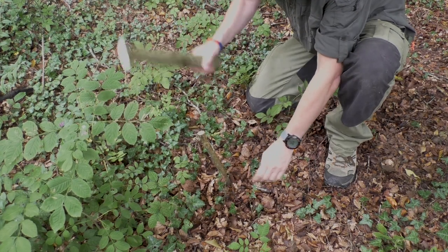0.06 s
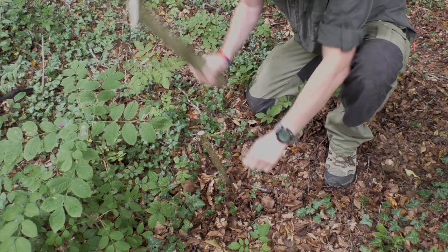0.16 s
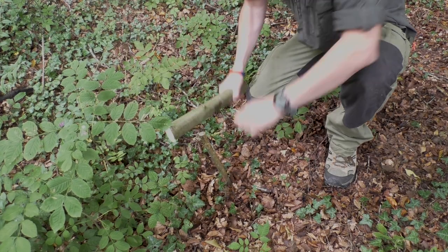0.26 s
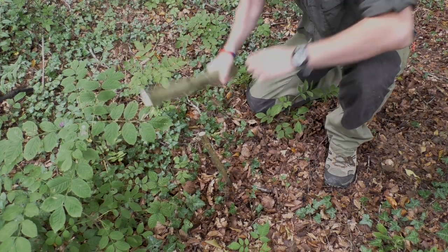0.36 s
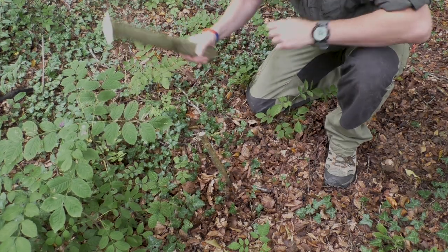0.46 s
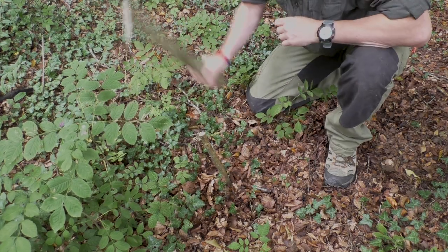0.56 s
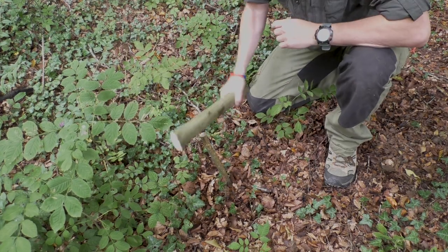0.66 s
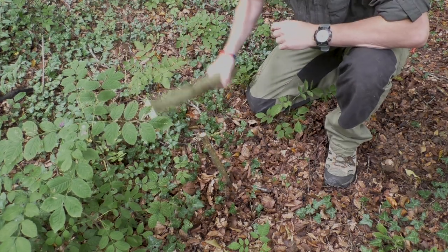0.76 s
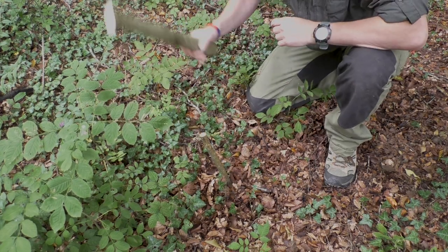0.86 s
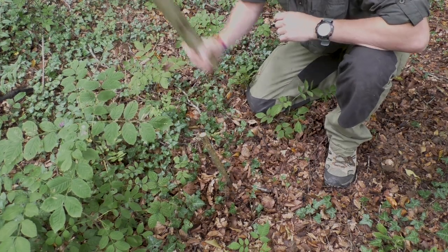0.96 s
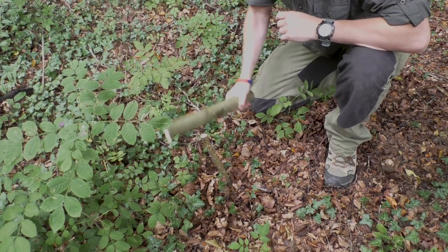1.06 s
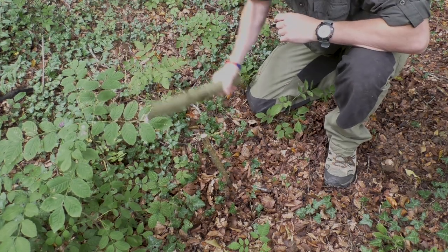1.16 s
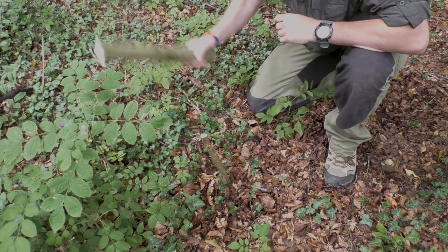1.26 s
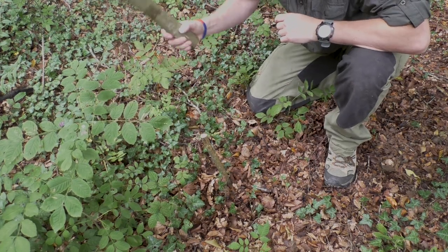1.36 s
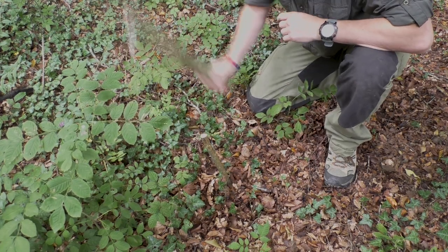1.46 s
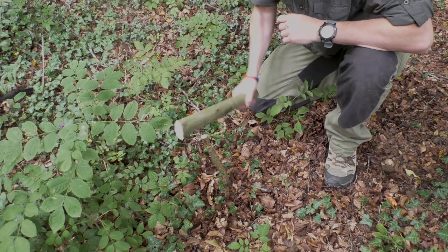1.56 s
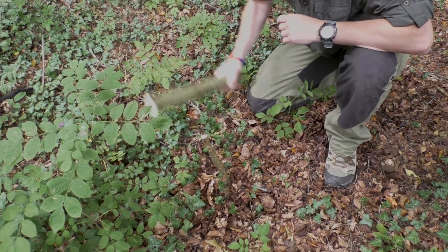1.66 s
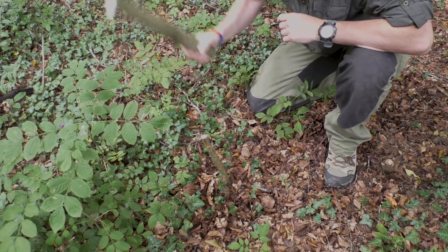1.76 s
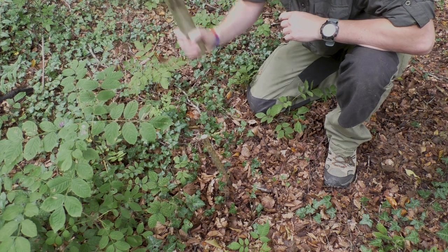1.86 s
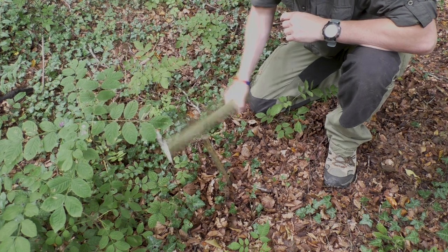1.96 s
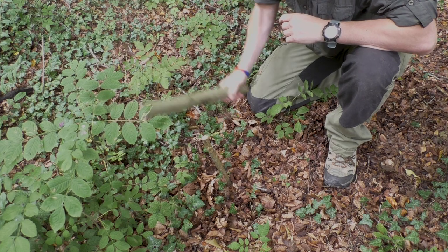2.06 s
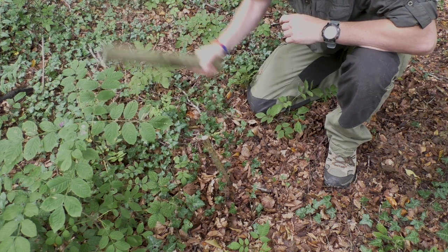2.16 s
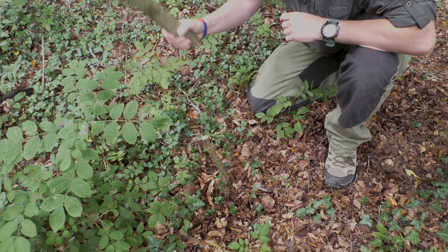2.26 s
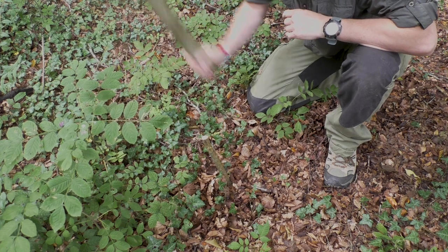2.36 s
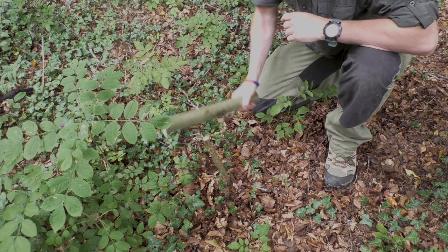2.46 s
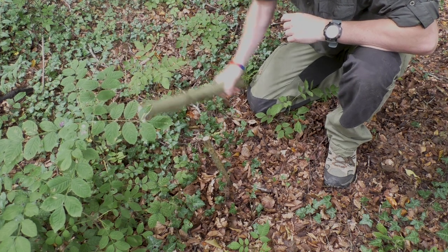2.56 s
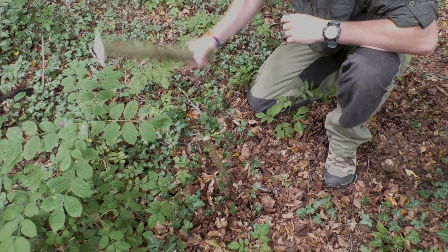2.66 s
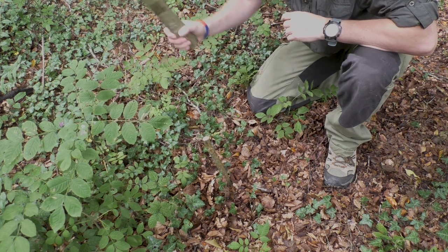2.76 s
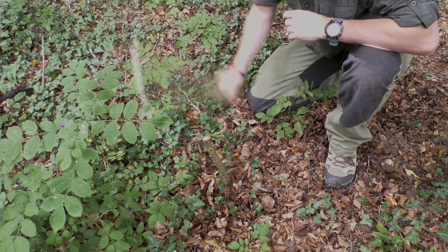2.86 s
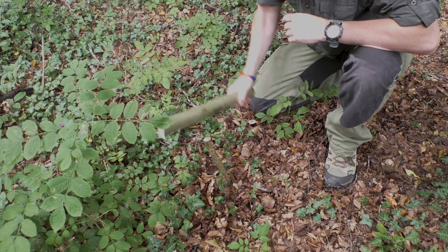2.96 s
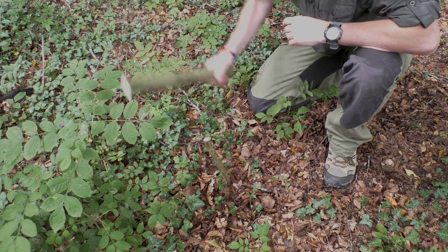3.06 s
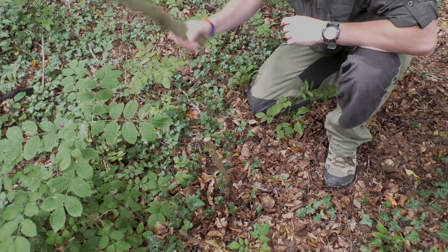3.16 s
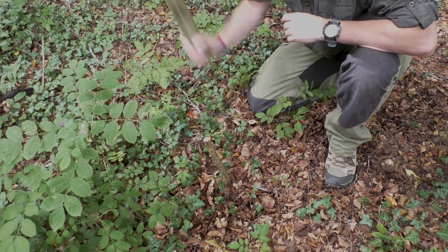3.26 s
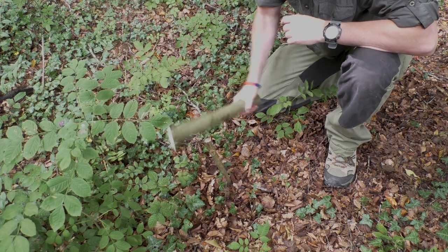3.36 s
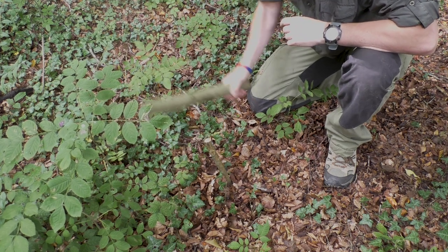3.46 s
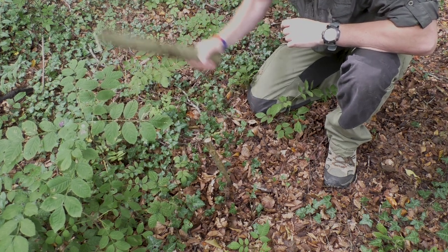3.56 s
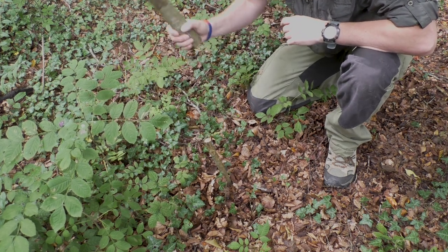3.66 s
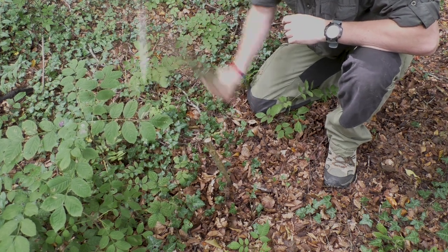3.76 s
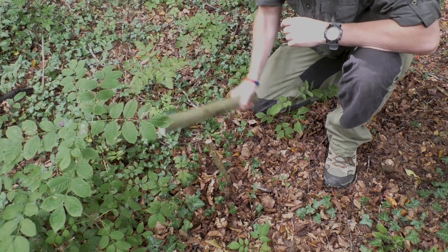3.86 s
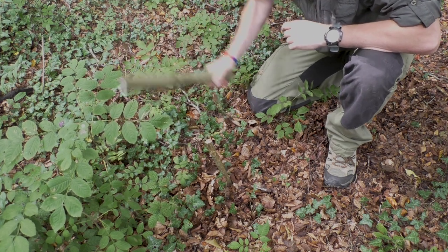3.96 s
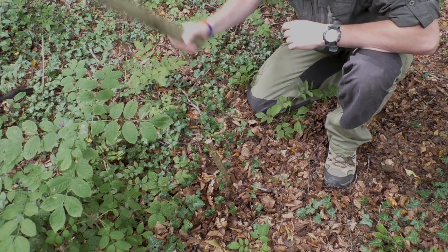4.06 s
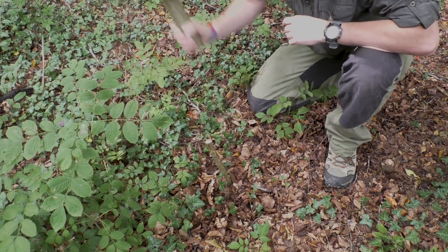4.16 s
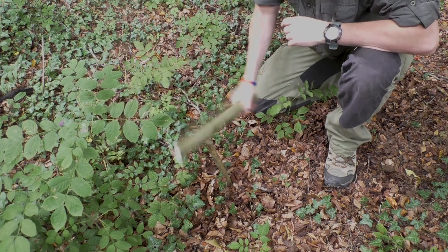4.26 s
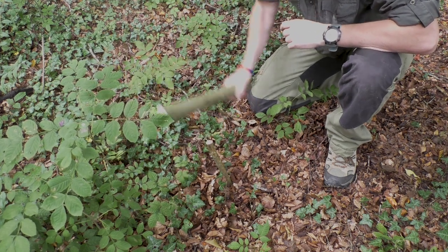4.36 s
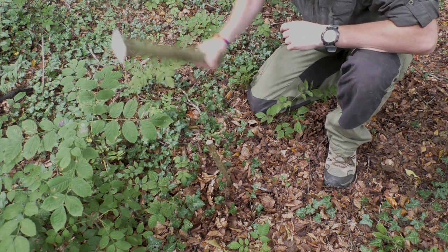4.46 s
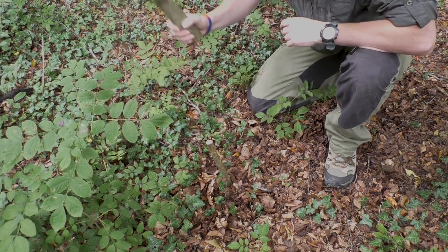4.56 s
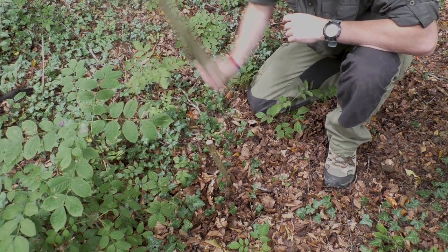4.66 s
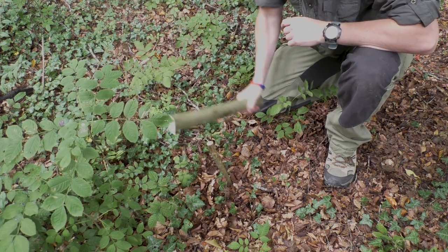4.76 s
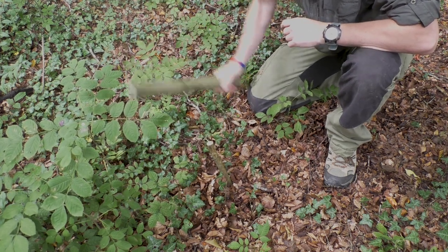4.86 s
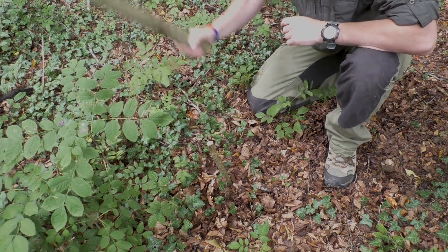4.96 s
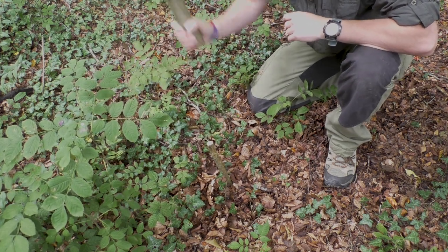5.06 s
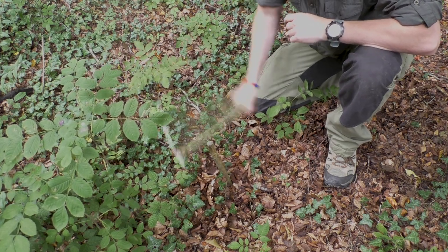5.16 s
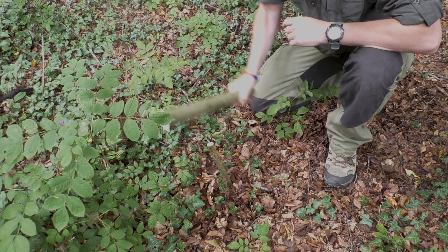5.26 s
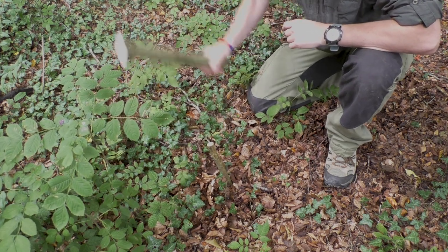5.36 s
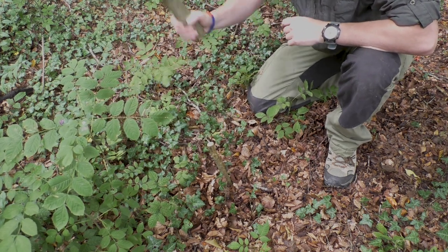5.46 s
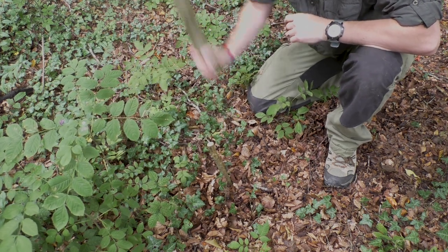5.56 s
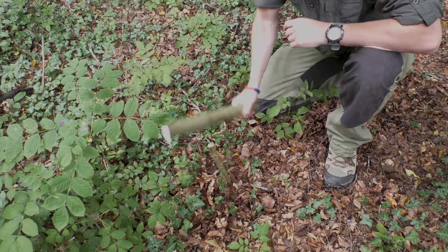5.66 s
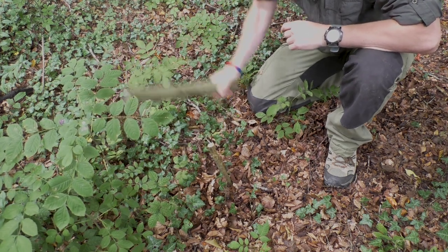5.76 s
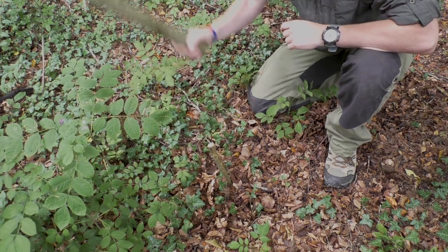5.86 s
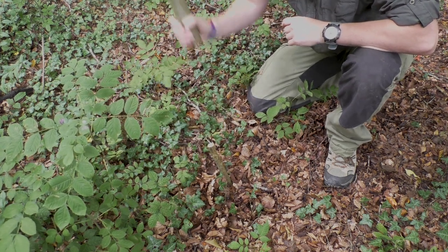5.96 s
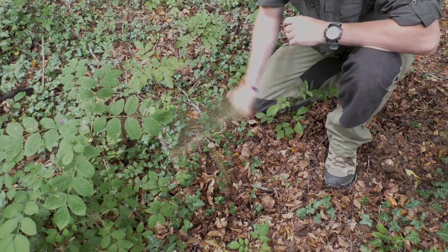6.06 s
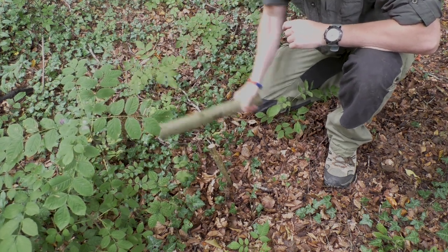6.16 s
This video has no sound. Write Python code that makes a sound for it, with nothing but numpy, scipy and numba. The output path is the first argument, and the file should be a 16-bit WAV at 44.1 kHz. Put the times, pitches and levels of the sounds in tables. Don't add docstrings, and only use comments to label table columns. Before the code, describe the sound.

Regular hammering with wood on wood, outdoors in woodland. Each blow is a hard, distorted clack with snapping bark, a short peg note and a dull soil thump, then a faint scattered echo from trees. Thuds deepen as the peg sinks; the last blow is softer and duller. Sleeve and dry litter rustle lightly, while wind presses in low flutters on the close microphone, strongest in the final two seconds.

```python
import sys
import numpy as np
from scipy import signal
from scipy.fft import rfft, irfft, next_fast_len
from scipy.io import wavfile
from scipy.ndimage import uniform_filter1d
from numba import njit

SR = 44100
rng = np.random.default_rng(int(sys.argv[2]) if len(sys.argv) > 2 else 0)


def nominal_scale(level):
    x = np.asarray(level, float) / 20
    return 10 ** x


def store_wav(level_fs):
    pcm = np.round(np.clip(np.atleast_2d(level_fs), -1, 1) * 32767)
    wavfile.write(sys.argv[1], SR, pcm.T.astype(np.int16))


N = 273420

# start in seconds, blow level in dB, ring of the stick's end in dB,
# bark crack in dB, contact time in milliseconds.
BLOWS = [(0.2669, -1.5, 2.5, 6.5, 0.35), (0.6627, -1.5, 2.5, 4.5, 0.29), (1.0915, 1.5, -0.5, 3.5, 0.4),
         (1.5583, 2, 1, 3, 0.4), (2.0171, 2, -4, 3.5, 0.38), (2.478, 2, -5, 0.5, 0.41),
         (2.9396, 2, -4, 0.5, 0.33), (3.395, 2, -0.5, 5, 0.4), (3.8506, 2.5, -2.5, 2, 0.35),
         (4.3153, 1.5, 1.5, 4.5, 0.4), (4.7658, 1, 3, 9, 0.39), (5.2233, -0.5, 4, 7.5, 0.12),
         (5.6793, 0.5, -3, 4, 0.21), (6.1253, -3.5, -7.5, 2.5, 0.44)]
# pitch in Hz, level in dB, time to fade by 60 dB in seconds.
STICK_NOTES = [(1231, 3.5, 0.011), (1580, -10, 0.016), (611, -4, 0.011)]
FLANK_NOTES = [(620, 17, 0.003), (1230, 8, 0.0065), (1450, -21, 0.036)]
STICK_END_NOTES = [(2300, -2, 0.019), (2050, -12, 0.052), (2200, -16, 0.045), (3700, -21, 0.035)]
PEG_NOTES = [(891, -8.5, 0.067)]
SUNK_PEG_NOTES = [(910, -1, 0.1)]
SOIL_NOTES = [(244, -7, 0.049), (154, -16.5, 0.14)]
# frequency in Hz, level in dB.
BARK_TONE = [(2600, -82), (3400, 2.5), (4800, -23.5), (5700, 5), (6400, 1.5), (7200, 0.5), (9500, -6),
             (11500, -34), (13500, 1), (15500, -23), (16000, -40)]
# time in seconds, level in dB.
WIND = [(0, -44), (.7, -49.5), (1.4, -46.5), (2.3, -49.5), (2.6, -50), (2.85, -34), (3.1, -43), (3.35, -39),
        (3.55, -37.5), (3.8, -40), (4.0, -36.5), (4.25, -25), (4.45, -41), (4.65, -24.5), (5.2, -24),
        (5.55, -25.5), (5.8, -29), (6.2, -19.5)]
# peak time in seconds, width in seconds, level in dB.
SHOVES = [
    (.6, 0.46, -26.5),
    (3.2, 0.19, -33),
    (3.7, 0.085, -22.5),
    (4.2, 0.088, -14.5),
    (6.08, .1, -9),
]
# frequency in Hz, level in dB.
FLUTTER_TONE = [(14, -40), (25, -13), (40, -0.5), (52, -5), (70, -20), (200, -83)]
# frequency in Hz, level in dB.
BUFFET_TONE = [(35, -30), (58, 21), (80, -4.5), (110, 4.5), (200, -43.5)]
# middle in seconds, width in seconds, level in dB.
RUSTLES = [(.17, .06, -65), (.42, 0.065, -73), (.88, 0.015, -73), (1.03, .04, -80), (1.28, 0.024, -69),
           (1.45, 0.036, -49.5), (1.73, 0.018, -60), (2.2, 0.038, -54), (2.45, .02, -67),
           (2.68, 0.042, -49), (2.9, .02, -60), (3.37, 0.036, -56), (3.82, .02, -57), (4.28, .03, -58),
           (5.15, 0.024, -54), (5.62, 0.051, -56)]
# start in seconds,
# peak level in dB, centre frequency in Hz.
TICKS = [(0.1394, -34, 6000), (0.4794, -47, 6070), (1.5194, -30, 6670), (1.6526, -32, 7340),
         (1.7325, -30, 6360), (1.791, -26, 6900), (1.973, -19, 7900), (2.1894, -41, 6090),
         (2.2094, -48, 5000), (2.6194, -25, 7400), (2.807, -26, 5930), (2.8964, -29, 5800),
         (3.3508, -21, 6850), (4.2794, -36, 5230), (5.1494, -35, 5440), (5.3694, -42, 5100),
         (5.5994, -34, 5090), (5.624, -33, 7000), (5.6403, -41, 5490),
         (0.2564, -14, 12400),
    (.652, -33, 13000),
]
# frequency in Hz, level in dB.
LITTER_TONE = [(2000, -11), (4000, 0), (7500, 3.5), (10500, -9), (13000, -2), (15600, -6), (16100, -38)]
# frequency in Hz, level in dB.
HUM_TONE = [(40, -27), (75, 0), (130, -9), (400, -10), (1450, -14.5), (1850, -22), (2350, -26.5),
            (2800, -36), (3300, -32.5), (5500, -30), (7900, -32), (10700, -47.5), (15700, -61),
            (16100, -80)]


def blows():
    out = np.zeros(N)
    bark = shaped(BARK_TONE)
    grip = 1 + 0.008 * rng.standard_normal((len(BLOWS), 2))
    for (s, blow_db, end_db, crack_db, contact_ms), (tune, end_tune) in zip(BLOWS, grip):
        contact_s = contact_ms / 1000
        on_flank = contact_ms > 0.42
        stick_notes = FLANK_NOTES if on_flank else STICK_NOTES
        peg_notes = SUNK_PEG_NOTES if on_flank else PEG_NOTES
        peg_tune = tune - 0.006 * s
        add(out, -nominal_scale(blow_db) * ring(stick_notes, tune, contact_s), s)
        add(out, nominal_scale(blow_db) * ring(peg_notes, peg_tune, contact_s), s)
        add(out, -nominal_scale(end_db) * ring(STICK_END_NOTES, end_tune, 0.00033), s)
        thud_db = 7.5 - 6 * np.exp(-s / 1.7) - 0.08 * end_db + 6 * on_flank
        add_thud(out, s, thud_db, tune)
        add(out, nominal_scale(crack_db) * crack(bark[int(s * SR) // 2:]), s)
    return signal.sosfilt(signal.butter(2, 90, "high", fs=SR, output="sos"), out)


def ring(notes, tune, push_s):
    t = np.arange(SR // 4) / SR
    x = np.zeros(len(t))
    for hz, db, t60 in notes:
        x += nominal_scale(db) * np.sin(2 * np.pi * hz * tune * t) * nominal_scale(-60 * t / t60)
    push = np.sin(np.pi * np.clip(t[:128] / push_s, 0, 1))
    return np.convolve(x, push / push.sum())[:len(t)]


def add_thud(out, s, thud_db, tune):
    spread_s = 0.0207
    add(out, -nominal_scale(thud_db) * ring(SOIL_NOTES, tune, 0.0011), s + 0.0031)
    add(out, nominal_scale(thud_db - 7.5) * ground_wave(spread_s), s + 0.0074)
    add(out, nominal_scale(thud_db - 23.5) * ground_wave(1.07 * spread_s), s + 0.055)


def ground_wave(spread_s):
    start_hz, end_hz, t60 = 237, 105.2, 0.13
    t = np.arange(SR // 4) / SR
    glide = spread_s * (1 - np.exp(-t / spread_s))
    turns = end_hz * t + (start_hz - end_hz) * glide
    return np.sin(2 * np.pi * turns) * np.minimum(t / 0.016, 1) * nominal_scale(-60 * t / t60)


def crack(bark):
    t = np.arange(SR // 4) / SR
    bark = bark[:len(t)]
    t = t[:len(bark)]
    fade = nominal_scale(-11.0 - 60 * t / 0.0055) + nominal_scale(-35.0 - 60 * t / 0.065)
    return np.minimum(t / 0.00014, 1) * fade * bark


def forest(knocks):
    t = np.arange(SR) / SR
    brief_blur = nominal_scale(-22.0 - 60 * t / 0.0057)
    far = nominal_scale(-44.5 - 60 * t / 0.72) * (1 - np.exp(-t / 0.068))
    scatter = rng.standard_normal(SR) * (brief_blur + far)
    scatter = signal.sosfilt(signal.butter(2, [1500, 9000], "band", fs=SR, output="sos"), scatter)
    return signal.fftconvolve(knocks, scatter)[:N]


def gusts():
    s, level_db = np.transpose(WIND)
    wind_db = np.interp(np.arange(N) / SR, s, level_db) + 30
    eddies_per_s, eddy_db, vent_limit = 12, 1.5, 0.4
    press = nominal_scale(-21.5 + 0.62 * wind_db) + swells(SHOVES)
    swing = vent_limit * np.tanh(press * band(2.8, 15.9) / vent_limit)
    flutter_db = -27 + 0.99 * wind_db + eddy_db * walk(eddies_per_s)
    buffet_db = -36.5 + 0.51 * wind_db + eddy_db * walk(eddies_per_s)
    return swing + nominal_scale(flutter_db) * shaped(FLUTTER_TONE) + nominal_scale(buffet_db) * shaped(BUFFET_TONE)


def rustle():
    grains = nominal_scale(1.8 * rng.exponential(1, N // 100 + 1)).repeat(100)[:N]
    out = (nominal_scale(-68.5) + swells(RUSTLES) * grains) * shaped(LITTER_TONE)
    t = np.arange(200) / SR
    for s, db, hz in TICKS:
        tick = np.cos(2 * np.pi * hz * t) + 0.83 * rng.standard_normal(len(t))
        add(out, nominal_scale(db - 12 - 60 * t / 0.0085) * tick, s)
    return out


def road_hum():
    level_db = -37.5 + 0.32 * np.arange(N) / SR + 0.84 * walk(5.54)
    return nominal_scale(level_db) * shaped(HUM_TONE)


def shaped(tone):
    hz, db = np.transpose(tone)
    size = next_fast_len(N)
    axis = np.log(np.arange(1, size // 2 + 2) * SR / size)
    gain = nominal_scale(np.interp(axis, np.log(hz), db))
    x = irfft(rfft(rng.standard_normal(size)) * gain, size)[:N]
    return x / x.std()


def band(lo_hz, hi_hz):
    sos = signal.butter(3, [lo_hz, hi_hz], "band", fs=SR, output="sos")
    x = signal.sosfilt(sos, rng.standard_normal(N))
    return x / x.std()


def walk(rate):
    k = int(SR / rate)
    steps = np.repeat(rng.standard_normal(N // k + 1), k)
    return 1.3 * uniform_filter1d(uniform_filter1d(steps, k), k)[:N]


def swells(table):
    t = np.arange(N) / SR
    return sum(nominal_scale(db) * np.exp(-((t - mid_s) / width_s) ** 2) for mid_s, width_s, db in table)


def add(out, x, s):
    i = int(s * SR)
    out[i:i + len(x)] += x[:N - i]


def scene():
    knocks = blows()
    return (knocks + forest(knocks) + gusts() + rustle() + road_hum())[None]


@njit
def follow(x, attack, release):
    y, e = np.empty(len(x)), 0.
    for i in range(len(x)):
        a = abs(x[i])
        e = e + attack * (a - e) if a > e else e * release
        y[i] = e
    return y


def gain_control(dry):
    recover_db_per_s, lag_s, ramp_s = 105, 0.0081, 0.014
    sensed = signal.sosfilt(signal.butter(2, 150, "high", fs=SR, output="sos"), dry[0])
    peak = follow(sensed, 1 / (0.00039 * SR), nominal_scale(-recover_db_per_s / SR))
    cut_db = -20 * np.log10(np.maximum(peak / 0.12, 1))
    cut_db -= np.maximum(7 - recover_db_per_s * np.arange(N) / SR, 0)
    late_db = np.interp(np.arange(N) - lag_s * SR, np.arange(N), cut_db)
    return dry * nominal_scale(uniform_filter1d(late_db, int(ramp_s * SR)))


def low_pass(x):
    return signal.sosfilt(signal.butter(12, 16950, fs=SR, output="sos"), x)


def record(dry):
    hiss = nominal_scale(-62.5) * band(5200, 8300) + nominal_scale(-78.5) * band(9000, 19000)
    x = gain_control(dry) + hiss
    x = signal.sosfilt(signal.ellip(8, 0.2, 50, 15650, fs=SR, output="sos"), x)
    x = np.clip(x, -0.99, 0.99)
    x = signal.sosfilt(signal.ellip(8, 0.1, 60, 16600, fs=SR, output="sos"), x)
    return low_pass(x)


dry = scene()
out = record(dry)
store_wav(out)
```